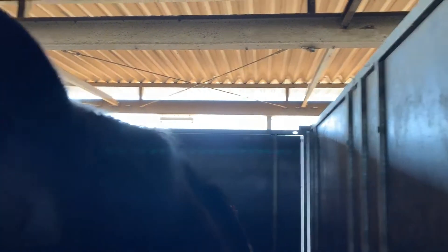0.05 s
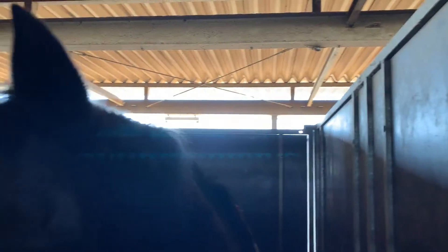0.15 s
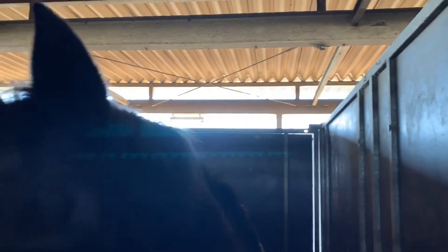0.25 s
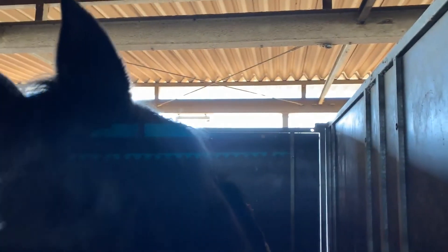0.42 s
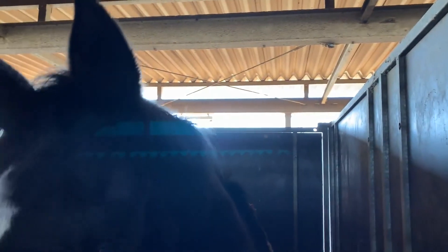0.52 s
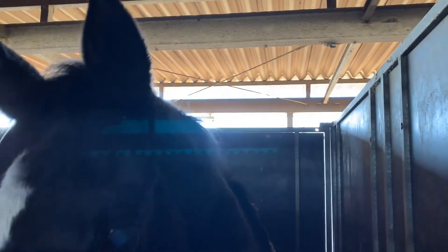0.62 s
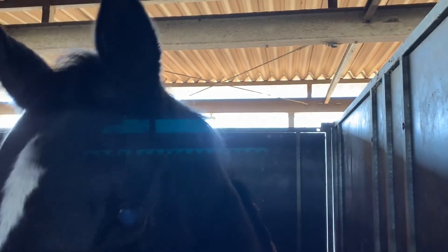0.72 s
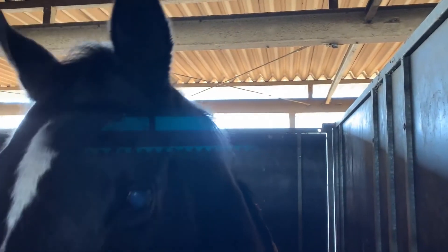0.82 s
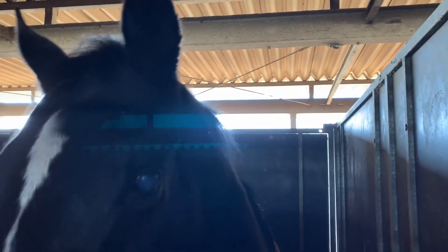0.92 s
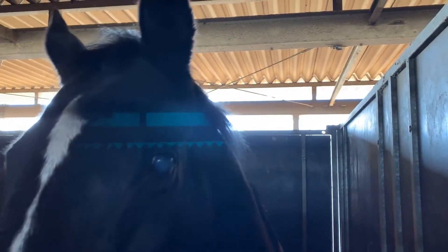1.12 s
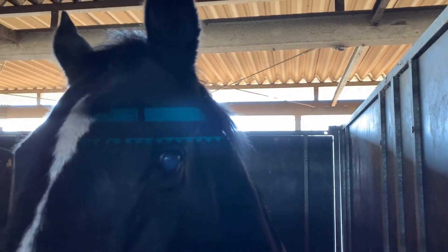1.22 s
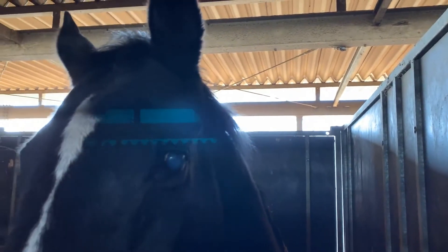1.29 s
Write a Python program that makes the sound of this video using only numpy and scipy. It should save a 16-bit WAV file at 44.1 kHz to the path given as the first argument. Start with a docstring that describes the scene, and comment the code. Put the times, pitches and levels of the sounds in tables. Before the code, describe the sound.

Soft, dull bumps come close to the microphone during the first 0.6 seconds as a horse turns its head, with the strongest thump at about 0.35 seconds. A faint brushing rustle with tiny scratches swells around it and fades by 0.8 seconds. From then on, distant small birds chirp with a slight echo, ending in a lower rising call near 1.3 seconds. A low, airy stable rumble continues throughout.

```python
"""A quiet stable, with a hand-held microphone close to a horse that turns its head.
A few soft, dull bumps come through, each a push that rings damped low modes. A faint brushing
rustle swells around them, with small, crisp scratches. Far off under the metal roof small birds
chirp and the barn echoes them. A low rumble, a drone and the airy wash of the barn lie underneath."""
import sys
import numpy as np
from scipy import signal
from scipy.fft import rfft, irfft, next_fast_len
from scipy.io import wavfile
from scipy.ndimage import uniform_filter1d, map_coordinates

SR = 44100
rng = np.random.default_rng(int(sys.argv[2]) if len(sys.argv) > 2 else 0)


def digitize_waveform(pressure):
    """Quantize a signal to 16-bit integers and store it at the path in sys.argv[1].

    Rows of a 2-D input are taken as channels; values are limited to [-1, 1].
    """
    field = np.atleast_2d(pressure).T
    bounded = np.clip(field, -1, 1)
    quanta = np.round(bounded * 32767).astype(np.int16)
    wavfile.write(sys.argv[1], SR, quanta)


N = 59535
FLUTTER_DB = .4  # fast flicker in the rustle and the air


# Bumps close to the microphone. Each row: start in seconds, peak level in dB, pitch factor,
# contact length in seconds.
BUMPS = [(.007, -45, .65, .012), (.112, -47, 1.5, .02), (.136, -49, .65, .014), (.192, -45, 1.2, .02),
         (.216, -41.5, 1.4, .0045), (.2263, -32.8, 1.68, .0051), (.274, -41, .95, .02),
         (.341, -21.3, 1.0, .0062), (.5365, -44.5, 1.1, .006), (.5664, -45.5, .82, .01)]
# A bump's modes at pitch factor 1. Each row: relaxed pitch in Hz, relative level in dB, t60 in seconds.
BUMP_MODES = [(40, 0, .09), (110, -7, .05), (140, 2, .028), (230, -4, .025)]

def bumps():
    """Each soft push rings heavily damped low modes, stiff at first and sinking as the contact relaxes."""
    stiffen, relax_s, side_db = 1.0, .015, -14
    t, mid = np.arange(N) / SR, np.zeros(N)
    low_cut = signal.butter(3, 64.2, "high", fs=SR, output="sos")
    sagging_time = np.cumsum(1 + stiffen * np.exp(-t / relax_s)) / SR
    for start, db, pitch, contact in BUMPS:
        push = np.exp(-(np.pi * ((t - start) / contact - .5)) ** 2)
        ring = sum(amp(level - 60 * t * pitch / t60) * np.cos(2 * np.pi * hz * pitch * sagging_time)
                   for hz, level, t60 in BUMP_MODES)
        thud = signal.sosfilt(low_cut, signal.fftconvolve(push, ring)[:N])
        mid += amp(db) * thud / np.abs(thud).max()
    side = amp(side_db) * filtered(mid, lambda hz: 1j * np.sign(hz))  # a quarter-cycle shift for width
    return np.array([mid + side, mid - side])


# The swish of the horse, close by. Each row: time in seconds, level in dB.
SWISH_LEVEL = [(0, -74.5), (.1, -68.5), (.19, -74), (.26, -65), (.35, -63.5), (.42, -68.5), (.68, -71.5),
               (.8, -80.5), (1.35, -92)]
# The swish and its lower body. Each row: frequency in Hz, relative density in dB.
SWISH_SPECTRUM = [(300, -20.5), (750, -7.5), (1100, -0.5), (1700, 1), (2800, 3.5), (4400, -4), (5600, -14),
                  (8500, -36.5), (15000, -38)]
SWISH_BODY_SPECTRUM = [(150, -7), (350, -1.5), (520, -4.5), (780, 2), (1150, 1.5), (1700, -6.5),
                       (3000, -28), (6000, -50)]

def rustle():
    """A soft brushing swells and fades as the horse turns, and gains body where it presses hardest."""
    firmest_body_db, body_swing = -64, 2.15
    swish_db = curve(SWISH_LEVEL)
    body_db = firmest_body_db + body_swing * (swish_db - swish_db.max())
    flutter = amp(FLUTTER_DB * wobble(36))
    swish = amp(swish_db) * stereo_noise(SWISH_SPECTRUM)
    body = amp(body_db) * stereo_noise(SWISH_BODY_SPECTRUM)
    return flutter * (swish + body)


# Faint scratches and ticks. Each row: start in seconds, length in seconds, level in dB.
SCRATCHES = [(.08, .04, -85), (.24, .075, -78), (.34, .045, -85), (.826, .007, -83), (1.037, .007, -79)]
# Their bright hiss. Each row: frequency in Hz, relative density in dB.
SCRATCH_SPECTRUM = [(2000, -25), (4500, 2), (6500, 1), (9000, 0), (12000, -3), (15500, -12)]

def scratches():
    """Short, grainy strokes of friction, like coarse hair or straw catching."""
    grain_db, grains_per_s = 1.8, 600
    strokes = sum(amp(db) * arch(progress(start, length)) for start, length, db in SCRATCHES)
    grain = unit(amp(grain_db * wobble(grains_per_s)))
    return strokes * grain * stereo_noise(SCRATCH_SPECTRUM)


# Birds far off under the roof. Each row: start and length in seconds, first, middle and last pitch
# in Hz, level in dB before the direct and echo gains, warble as a share of the pitch.
CHIRPS = [(.757, .02, 3200, 3800, 4500, -76.5, .01), (.772, .028, 4580, 4570, 4560, -76.5, .011),
          (.812, .028, 4560, 4600, 4620, -81, .012), (.84, .045, 4020, 3920, 3800, -77, .02),
          (1.024, .046, 3750, 4060, 3980, -74, .026), (1.075, .03, 3950, 3800, 3700, -77.5, .055),
          (1.11, .045, 3850, 3550, 3250, -68.3, .055), (1.153, .058, 3450, 3660, 3600, -69.3, .052)]
# One lower, rising call far off, laid out like a chirp.
FAR_CALL = (1.288, .1, 1220, 1440, 1480, -69.5, .048)

def birds():
    """Gliding, warbling whistles, distant enough to arrive with more echo than direct sound."""
    direct_db, echo_db = -4.5, -1.5
    out = np.zeros((2, N))
    for start, length, first_hz, middle_hz, last_hz, db, warble in [*CHIRPS, FAR_CALL]:
        position = progress(start, length)
        glide_hz = np.interp(position, [0, .5, 1], [first_hz, middle_hz, last_hz])
        hz = glide_hz * (1 + warble * wobble(900))
        note = amp(db) * arch(position) * np.sqrt(2) * np.sin(2 * np.pi * np.cumsum(hz) / SR)
        out += amp(direct_db) * note + amp(echo_db) * barn_echo(note)
    return out


# How the barn rings on. Each row: frequency in Hz, t60 in seconds.
BARN_DECAY = [(300, .5), (3500, .2), (9000, .15)]

def barn_echo(x):
    """A diffuse tail, different left and right, whose treble dies first."""
    hz, t, noise = signal.stft(rng.standard_normal((2, SR // 2)), SR, nperseg=256)
    decay = amp(-60 * t / along(BARN_DECAY, hz)[:, None])
    tail = signal.istft(noise * decay, SR, nperseg=256)[1]
    return signal.fftconvolve(x[None], tail / np.linalg.norm(tail[0]), axes=1)[:, :N]


# The room tone around the microphone. Each row: frequency in Hz, relative density in dB.
RUMBLE_SPECTRUM = [(15, -43.5), (30, -11), (48, -3), (66, -4.5), (95, -12.5), (150, -22), (300, -32),
                   (600, -79)]
DRONE_SPECTRUM = [(50, -23.5), (110, -0.5), (180, 0.5), (240, -2), (285, -2.5), (320, -9.5), (420, -20),
                  (600, -38.5), (1200, -74)]
AIR_SPECTRUM = [(240, -35), (400, -10.5), (550, -12.5), (750, -6.5), (1000, 1), (1500, -4), (2100, -4),
                (2800, -2.5), (3500, -11), (4300, -19.5), (5400, -26), (6200, -21), (8500, -31.5),
                (11200, -23.5), (13500, -33.5), (15500, -26.5)]
# How each of these noises drifts. Each row: time in seconds, level in dB.
RUMBLE_LEVEL = [(0, -60), (.07, -55), (.17, -60), (.27, -49), (.33, -50), (.42, -53), (.47, -59),
                (.56, -62), (.67, -56.5), (.84, -62), (.93, -57.5), (1.13, -64), (1.27, -61), (1.35, -53)]
DRONE_LEVEL = [(0, -64), (.3, -61.5), (.48, -68), (.95, -64.5), (1.05, -63), (1.35, -62.5)]
AIR_LEVEL = [(0, -68), (.2, -65.5), (.58, -67), (.85, -67), (1.0, -65.5), (1.25, -65.5), (1.35, -67.5)]

def room_tone():
    """Rumble, a low drone with a wavering hum in it, and the airy wash of the barn."""
    hum_hz, hum_db = 284.7, -9.5  # level relative to the drone's noise
    tone = np.sin(2 * np.pi * hum_hz * np.arange(N) / SR + 0.5 * wobble(12))
    hum = amp(hum_db) * unit(tone * amp(2.1 * wobble(6.9)))
    rumble = amp(curve(RUMBLE_LEVEL)) * stereo_noise(RUMBLE_SPECTRUM)
    air = amp(curve(AIR_LEVEL) + FLUTTER_DB * wobble(13.26)) * stereo_noise(AIR_SPECTRUM)
    drone = amp(curve(DRONE_LEVEL)) * (stereo_noise(DRONE_SPECTRUM) + hum)
    return rumble + drone + air


# Likeness of the microphone's two channels. Each row: frequency in Hz, correlation from -1 to 1.
CORRELATION = [(60, 0.79), (150, 1), (280, 0.2), (500, 0.14), (1100, -0.47), (2200, -0.12), (4000, 0.0084),
               (8000, -0.042), (13000, -0.083)]

def stereo_noise(spectrum):
    """Slightly patchy noise of rms 1: near mono in the bass, diffuse above."""
    def mid_side_gains(hz):
        angle = np.arccos(np.clip(along(CORRELATION, hz), -1, 1)) / 2
        return amp(along(spectrum, hz)) * [np.cos(angle), np.sin(angle)]

    patchy_db = .8
    white = signal.stft(rng.standard_normal((2, N)), nperseg=1024)[2]
    patches = uniform_filter1d(rng.standard_normal(white.shape), size=3, axis=1)  # across frequency
    patches = uniform_filter1d(patches, size=12, axis=2)  # across time
    pair = signal.istft(white * amp(patchy_db * unit(patches)), nperseg=1024)[1][:, :N]
    mid, side = filtered(pair, mid_side_gains)
    return unit(np.array([mid + side, mid - side]))


def amp(db):
    """Decibels to gain."""
    return 10 ** (np.asarray(db) / 20)


def unit(x):
    """Scale to rms 1."""
    return x / np.sqrt(np.mean(x ** 2) + 1e-20)


def along(points, hz):
    """Interpolate (Hz, value) points on a log axis."""
    knots_hz, values = np.transpose(points)
    return np.interp(np.log(hz + 1), np.log(knots_hz + 1), values)


def curve(rows):
    """One value per sample from (seconds, value) rows."""
    return np.interp(np.arange(N) / SR, *np.transpose(rows))


def progress(start, length):
    """A ramp from 0 to 1 over an event."""
    return np.clip((np.arange(N) / SR - start) / length, 0, 1)


def arch(position):
    """A rounded swell, silent at positions 0 and 1."""
    return np.sqrt(np.abs(np.sin(np.pi * position)))


def wobble(rate):
    """A smooth random curve, rate knots a second."""
    return map_coordinates(rng.standard_normal(4096), [np.arange(N) * rate / SR + 2], mode="wrap")


def filtered(x, response):
    """Shape x by a gain that depends on frequency."""
    size = next_fast_len(N + SR // 2)
    return irfft(rfft(x, size) * response(np.fft.rfftfreq(size, 1 / SR)), size)[..., :N]


def scene():
    """Everything that reaches the stereo microphone beside the horse."""
    return room_tone() + rustle() + scratches() + birds() + bumps()


def record(dry):
    """The hand-held recorder keeps nothing above its band limit."""
    top_hz = 15900
    return filtered(dry, lambda hz: hz < top_hz)


dry = scene()
out = record(dry)
digitize_waveform(out)
```